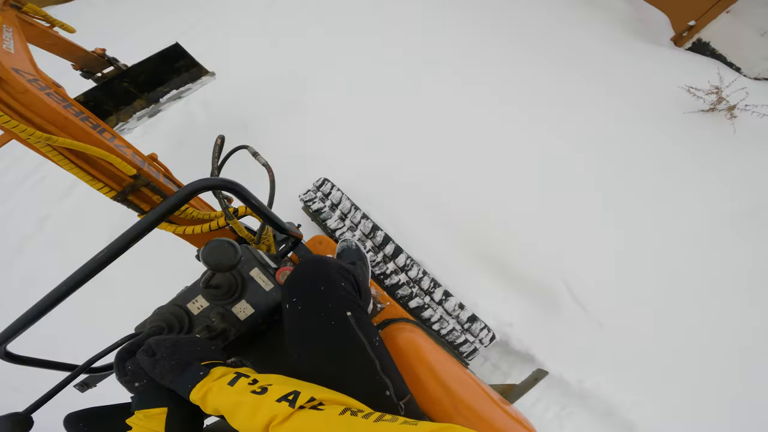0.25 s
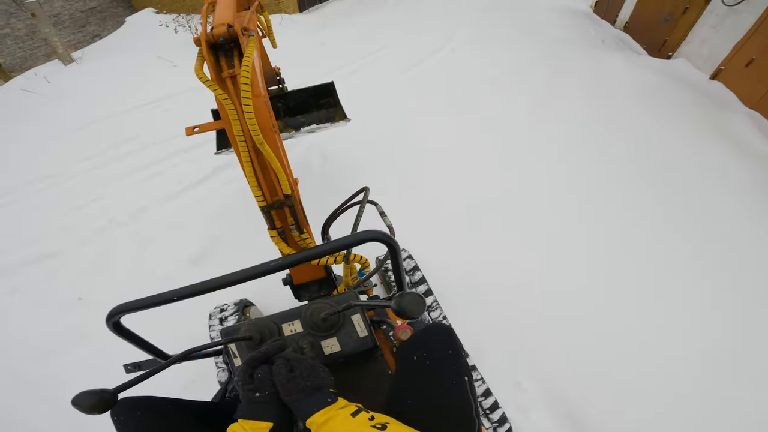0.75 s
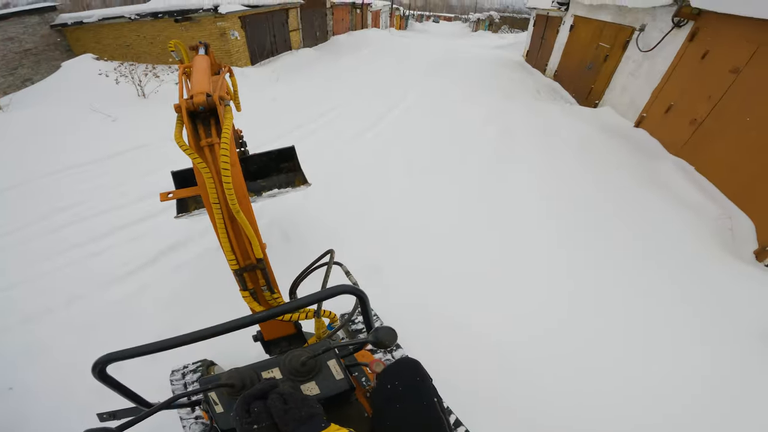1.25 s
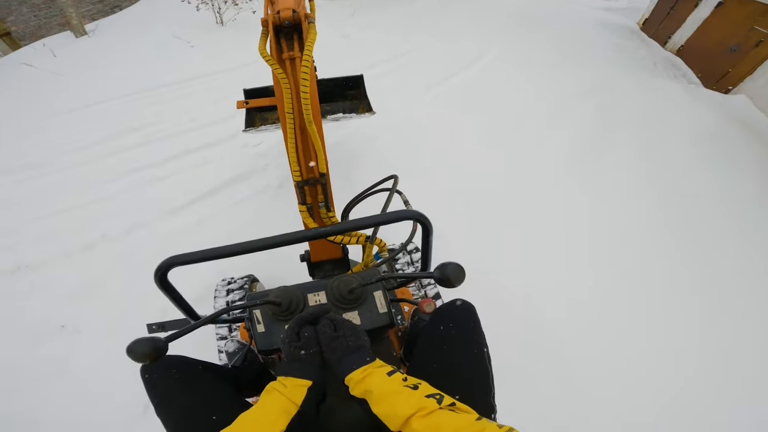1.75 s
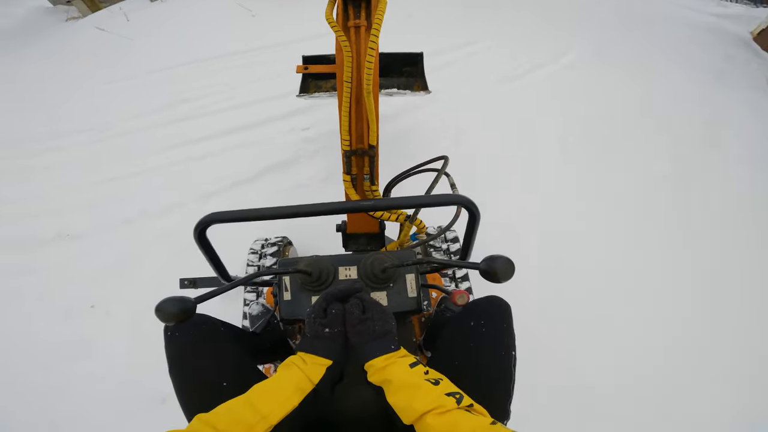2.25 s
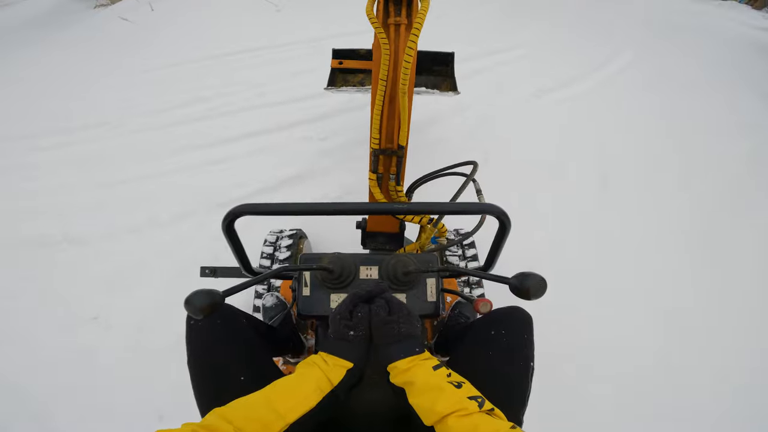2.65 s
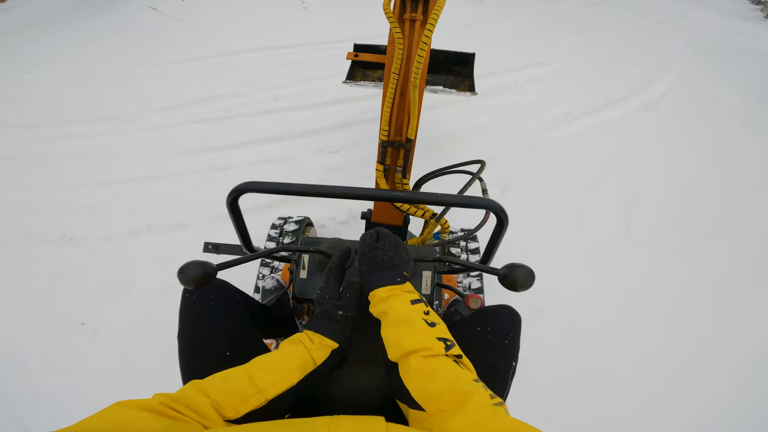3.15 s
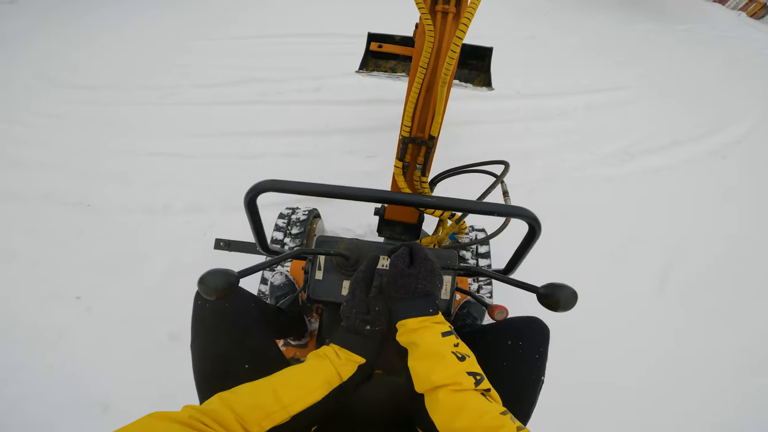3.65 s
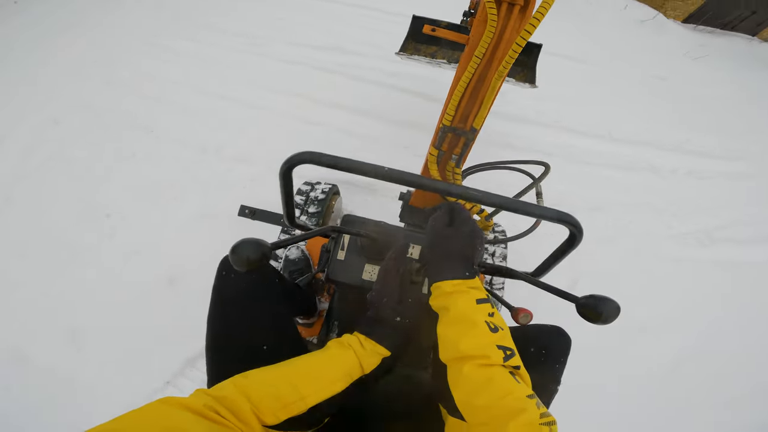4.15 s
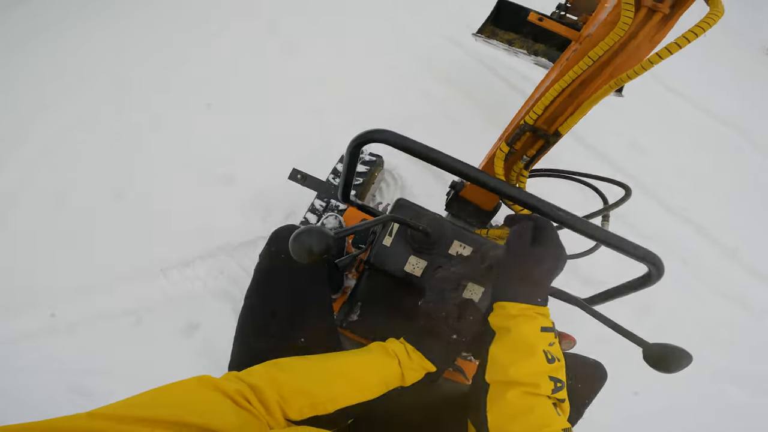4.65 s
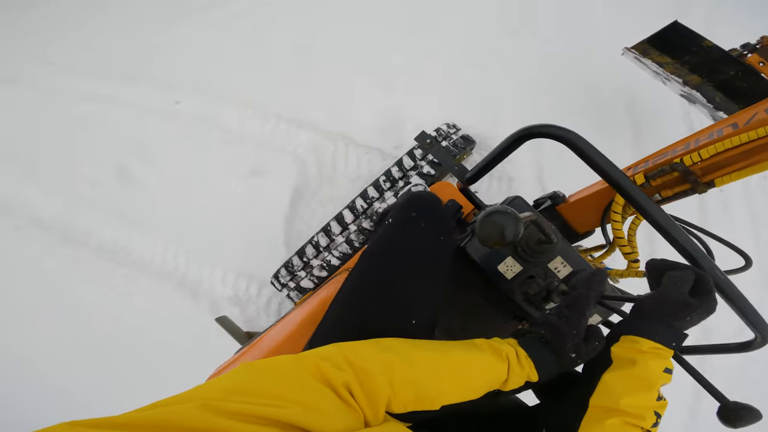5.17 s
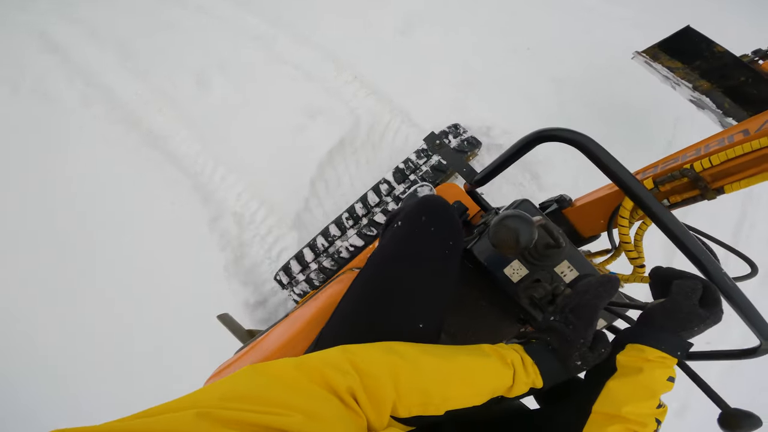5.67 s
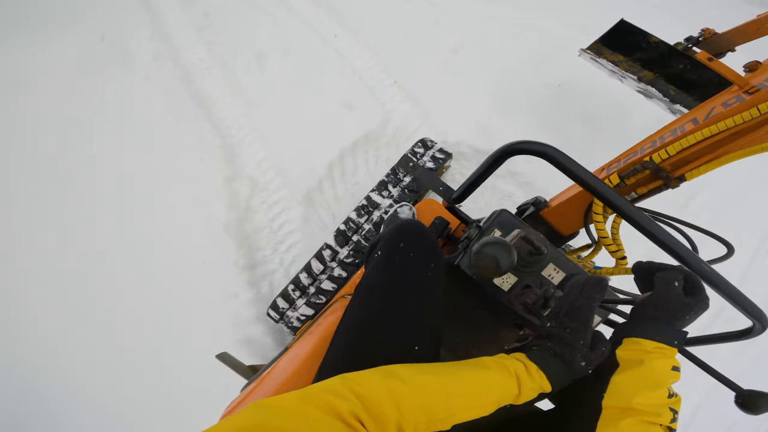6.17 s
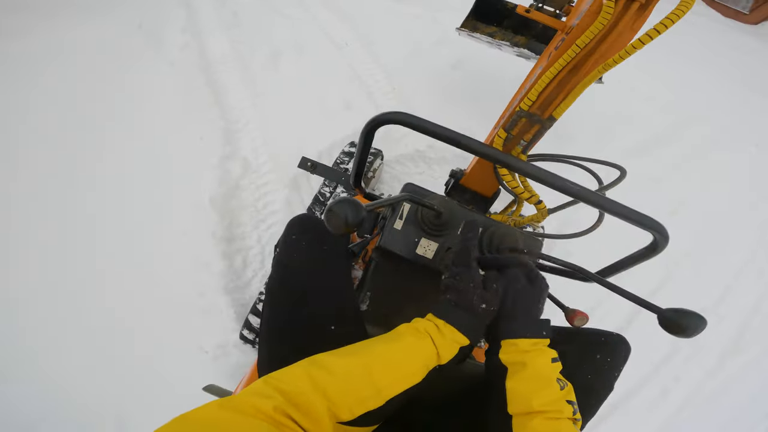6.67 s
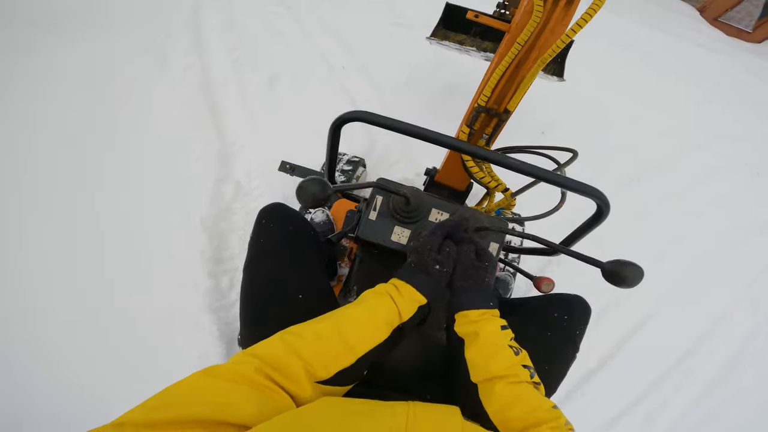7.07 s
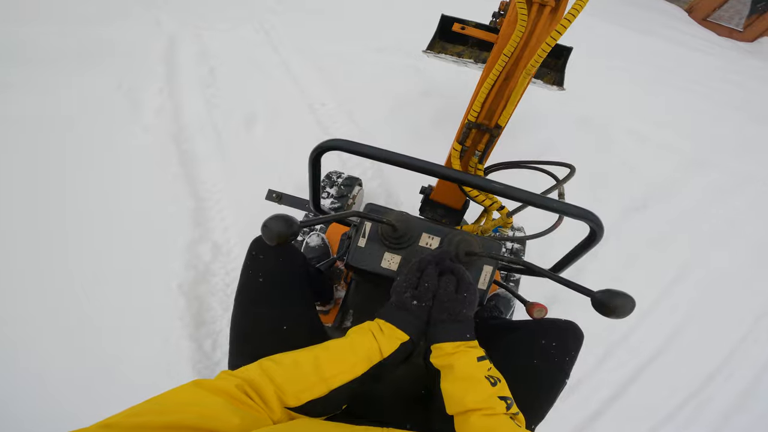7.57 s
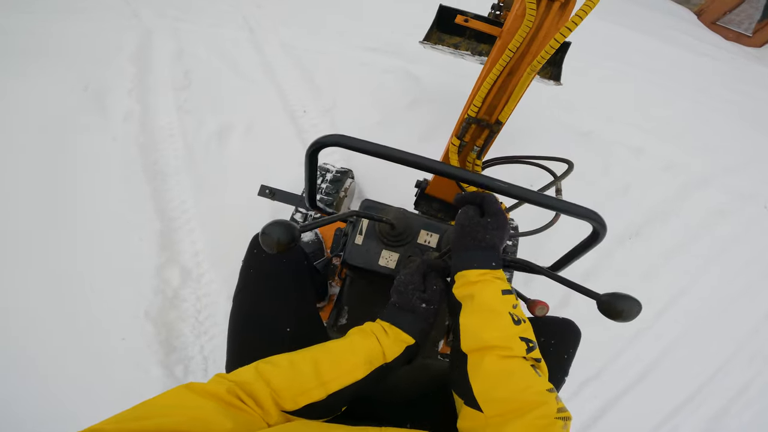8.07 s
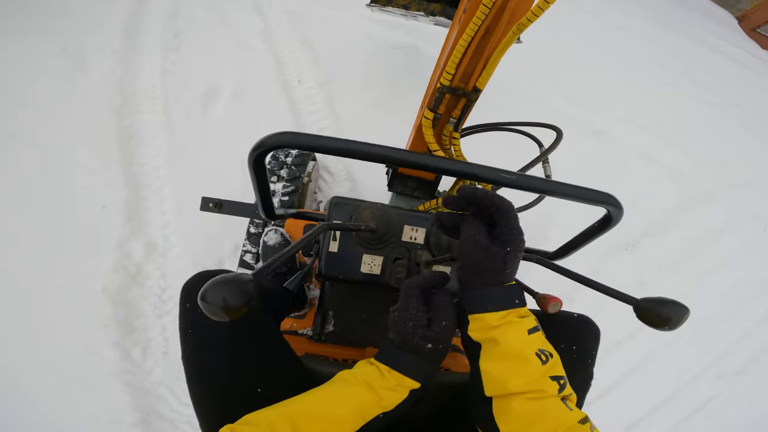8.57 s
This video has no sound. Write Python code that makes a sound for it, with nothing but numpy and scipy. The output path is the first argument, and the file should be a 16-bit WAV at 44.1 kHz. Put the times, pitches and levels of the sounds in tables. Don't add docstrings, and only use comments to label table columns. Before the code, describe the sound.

A small one-cylinder diesel chugs steadily under a crawling tracked digger, with loose metal track links clinking and ice crunching faintly in snow.

```python
import sys
import numpy as np
from scipy import signal
from scipy.fft import rfft, irfft, next_fast_len
from scipy.io import wavfile
from scipy.ndimage import uniform_filter1d

SR = 44100
rng = np.random.default_rng(int(sys.argv[2]) if len(sys.argv) > 2 else 0)


def output_pcm(signal):
    pcm = np.clip(np.atleast_2d(signal).T, -1, 1) * 32767
    wavfile.write(sys.argv[1], SR, np.round(pcm).astype(np.int16))


def field_ratio(decibels):
    return 10 ** (np.asarray(decibels, dtype=float) / 20)


N = 388962
T = np.arange(N) / SR


def level(x, db):
    return x * field_ratio(db) / np.sqrt(np.mean(x ** 2))


def band(x, hz, width):
    width_rad = 2 * np.pi * width
    b, a = signal.bilinear([width_rad, 0], [1, width_rad, (2 * np.pi * hz) ** 2], SR)
    return signal.lfilter(b, a, x)


def dull(x, hz):
    return signal.sosfilt(signal.butter(3, hz, fs=SR, output="sos"), x)


def thin(x, hz):
    return signal.sosfilt(signal.butter(3, hz, "high", fs=SR, output="sos"), x)


def colour(x, spectrum):
    hz, db = np.transpose(spectrum)
    size = next_fast_len(N)
    f = np.arange(size // 2 + 1) * SR / size + 1
    gain = field_ratio(np.interp(np.log(f), np.log(hz), db))
    return irfft(rfft(x, size) * gain, size)[:N]


def walk(rate):
    hold = int(SR / rate)
    steps = np.repeat(rng.standard_normal(N // hold + 1), hold)[:N]
    return 0.75 * uniform_filter1d(uniform_filter1d(steps, hold), hold)


def clicks(times, sizes):
    place = np.clip(np.asarray(times) * SR, 0, N - 2)
    i = place.astype(int)
    return np.bincount(i, sizes * (1 - place + i), N) + np.bincount(i + 1, sizes * (place - i), N)


def die_away(hits, t60):
    return signal.lfilter([1], [1, -np.exp(-np.log(1000) / (t60 * SR))], hits)


def burst(times, db, t60):
    return die_away(clicks(times, field_ratio(db)), t60) * rng.standard_normal(N)


def struck(times, db, hz, t60):
    width = np.log(1000) / (np.pi * t60)
    return band(clicks(times, field_ratio(db)), hz, width) * SR / (2 * np.pi * width)


def strokes(turns, at, scatter_db, jitter_s):
    cycles = np.arange(int(turns[-1]) + 1) + at
    cycles = cycles[(cycles > turns[0]) & (cycles < turns[-1])]
    late, size = rng.standard_normal((len(cycles), 2)).T
    times = np.interp(cycles, turns, T) + jitter_s * late
    return clicks(times, field_ratio(scatter_db * size)) * SR / 43


def ring(pulses, modes):
    return sum(np.sign(way) * field_ratio(db) * band(pulses, hz, width) for hz, width, db, way in modes)


def gate(start_s, length_s, fade_s):
    return np.clip(np.minimum(T - start_s, start_s + length_s - T) / fade_s, 0, 1)


# pitch_hz, share_0_to_1
LIKENESS = [(100, 0.5), (500, 0.92), (1000, 0.82), (2500, 0.67), (6000, 0.82), (12000, 0.93)]


def wide(mid, side):
    hz, share = np.clip(np.array(LIKENESS), 0, [SR, .999]).T
    odd = colour(side, np.c_[hz, 10 * np.log10((1 - share) / (1 + share))])
    return np.array([mid + odd, mid - odd])


# time_s, speed_hz
SPEED = [(0.0, 21.567), (1.66, 21.609), (2.04, 21.588), (2.31, 21.768), (3.12, 21.614), (3.39, 22.116),
         (4.11, 22.017), (4.17, 22.118), (4.52, 20.937), (4.99, 21.323), (5.55, 21.176), (6.64, 21.277),
         (6.86, 21.797), (6.96, 21.17), (8.09, 21.496), (8.19, 21.919), (8.49, 20.913), (8.82, 20.985)]


def engine():
    speed_hz = np.interp(T, *np.transpose(SPEED))
    return speed_hz, .1357 + np.cumsum(speed_hz) / SR


# pitch_hz, width_hz, level_db, polarity (-1 or 1)
EXHAUST = [(28.1, 19, -21, -1), (54.4, 84.5, -21.7, 1), (58.6, 14, -15.6, -1), (142.3, 10, -15.6, 1),
           (205.5, 11.7, -17.5, -1), (274.8, 35.2, -31.7, -1)]
INTAKE = [(4, 10, -19.1, -1), (124.8, 37.9, -24.4, -1), (196, 40.2, -21.4, 1), (311, 10, -29.3, 1),
          (374, 10, -28.4, 1)]
HOOD = [(228, 21.4, -28, 1), (273.2, 12, -27, -1), (329, 32, -29.5, 1), (365.7, 12, -26.5, -1),
        (428, 28, -43, 1), (506, 54, -45, -1)]


def gas(turns, hood_db, throb_db):
    exhaust = ring(strokes(turns, .7734, .2, .00005), EXHAUST)
    intake = ring(strokes(turns, .0799, .3, .00005), INTAKE)
    puff = signal.windows.gaussian(201, .0005 * SR)
    slaps = strokes(turns, .36, .8, .00006) - .45 * strokes(turns, .86, .8, .00006)
    hood = level(ring(slaps, HOOD), -3.0) * field_ratio(hood_db)
    out = np.convolve(exhaust + intake, puff / puff.sum(), "same") + hood
    lead = int(np.interp(turns[0] + 4, turns, T) * SR)
    out = np.r_[out[lead:2 * lead], out[lead:]]
    out = out + (field_ratio(throb_db) - 1) * band(out, 148.0, 42)
    return np.array([out * field_ratio(-.3), np.roll(out, 1)])


# pitch_hz, width_hz, level_db, polarity (-1 or 1)
BLOCK = [(956, 57, 9.5, 1), (1009, 41, 13, -1), (1090, 220, -14.5, 1), (1783, 31, -1, -1), (690, 70, -3, 1)]
HEAD = [(1128, 44, 13, 1), (1191, 50, 4.5, 1), (1261, 25, 5, 1), (2970, 190, -19, 1),
        (4300, 400, -31.5, -1)]


def knock(turns, block_db, head_db, cover_db):
    firing = strokes(turns, .49, 1.6, .00003)
    valves = strokes(turns, .82, 0.67, .0001) + field_ratio(-5.0) * strokes(turns, 0.3, 0.83, .0001)
    raps = firing + field_ratio(-5.5) * valves
    block = level(ring(raps, BLOCK), -7.5) * field_ratio(block_db)
    head = level(ring(raps, HEAD), -9.0) * field_ratio(head_db)
    cover = level(band(raps, 1074, 82), -9.5) * field_ratio(cover_db)
    return block + head + cover


def pump(turns, low_db, high_db, hood_db):
    def tone(order, db):
        loudness = np.sqrt(2) * field_ratio(db + 1.8 * walk(12))
        return loudness * np.sin(2 * np.pi * order * turns + 0.25 * walk(5))

    low = tone(28, low_db - 1.5) + tone(20, np.maximum(hood_db - 15, low_db - 2.5))
    return low + tone(24, high_db) + tone(32, high_db) + tone(56, high_db - 7.5)


def valve_gear(turns, db):
    def rasp(hits, t60):
        return die_away(hits, t60) * rng.standard_normal((2, N))

    intake_seat = strokes(turns, .04, 3.0, 0.00048)
    exhaust_seat = strokes(turns, .3, 2.5, 0.00093)
    seats = rasp(intake_seat + exhaust_seat, .045)
    seats = level(band(band(seats, 2900, 2400), 2900, 2400), -8.0)
    spit = rasp(strokes(turns, .51, 2.3, 0.0009), 0.036)
    spit = level(dull(band(band(spit, 7000, 3000), 7000, 3000), 9000), -21)
    return wide(*(seats + spit)) * field_ratio(db)


# time_s, peak_db, treble_db, own_pitch_hz
LEFT_CLINKS = [(0.351, -26.5, -31, 2280), (0.759, -27, -29, 2450), (0.8076, -15, -36, 2310),
               (0.949, -16, -23, 2310), (1.0358, -23, -22, 2290), (1.089, -15.5, -24, 2326),
               (1.165, -31, -26, 2450), (1.4277, -31, -29, 2130), (1.4672, -19, -23, 3170),
               (1.6258, -28.5, -12, 3600), (1.7766, -24, -17, 2300), (1.918, -20, -14, 3140),
               (2.0416, -31, -13, 2270), (2.0564, -14.5, -15, 2280), (2.1785, -22.5, -13.5, 3480),
               (2.193, -17, -17, 2330), (2.25, -19, -27, 2430), (2.2644, -22.5, -17, 2450),
               (2.338, -30.5, -23, 3370), (2.6788, -36, -16, 2100), (2.8126, -31, -23, 2360),
               (2.957, -37, -31, 2780), (3.3821, -22.5, -27, 2730), (3.406, -23, -28, 2440),
               (3.439, -23.5, -19, 1960), (3.527, -22, -26, 2440), (3.5469, -24, -30, 2430),
               (3.5686, -25, -35, 2460), (3.706, -28, -25, 2450)]
RIGHT_CLINKS = [(4.384, -26.5, -35, 2450), (4.76, -26, -23, 4020), (5.0217, -32, -12, 2300),
                (5.124, -33, -22, 2700), (5.19, -24, -30.5, 3110), (5.36, -35, -11, 2300),
                (5.471, -34, -6, 2360), (6.0757, -19.5, -15, 2920), (6.161, -28.5, -17, 3060),
                (6.399, -32.5, -17, 2980), (6.516, -25.5, -30, 3000), (6.536, -27.5, -22, 2250),
                (6.8093, -29, -29, 2440), (6.8963, -29, -17, 2380), (7.037, -23.5, -14, 2770),
                (7.08, -23.5, -24, 2400), (7.1843, -20, -18, 2260), (7.3178, -22, -21, 2610),
                (7.491, -19, -36, 2400), (7.5536, -22.5, -14, 2100), (7.6066, -26, -29, 2330),
                (7.6385, -22, -27, 2500), (7.763, -28, -24, 2140), (8.105, -21.5, -31, 2460),
                (8.128, -25, -26, 2440), (8.258, -25, -31, 2400), (8.3967, -19.5, -34, 2100),
                (8.4157, -26, -13, 2100), (8.568, -24.5, -19, 2500), (8.7293, -23, -16, 2310)]


def track_hits(count):
    faint = []
    for when, size, pitch, pan in rng.random((count, 4)):
        hz = 2500 * (0.66 + .5 * pitch)
        faint.append((.99 * when * N / SR, -40 + 6 * (size - .5), -15.5, hz, 8 * (pan - .5)))
    left = [(*hit, 3) for hit in LEFT_CLINKS]
    right = [(*hit, -3.5) for hit in RIGHT_CLINKS]
    return sorted(left + right + faint)


# pitch_hz, level_db, fall_by_60_db_s
CLINK_MODES = [(1890, -3, 0.019), (2100, -20.5, 0.16), (2367, -3, 0.059), (3258, -0.5, 0.03),
               (3370, -11, 0.021), (3540, -13, 0.18), (4320, -19, 0.021), (4300, -26.5, 0.094),
               (5920, -8.5, 0.058)]


def clinks():
    s, db, treble_db, own_hz, pan_db = np.transpose(track_hits(count=18))
    share_db = 1.3 * rng.standard_normal((len(s), len(CLINK_MODES)))
    rings = 0
    for k, (hz, mode_db, t60) in enumerate(CLINK_MODES):
        rings = rings + struck(s, db + mode_db + share_db[:, k] - 9.0, hz, min(t60, .065) * 0.9)
    for at, size_db, hz in zip(s, db, own_hz):
        i = int(at * SR)
        ringing = T[:min(4000, N - i)]
        fall = field_ratio(size_db - 11.0 - 60 * ringing / 0.067)
        rings[i:i + 4000] += fall * np.sin(2 * np.pi * hz * ringing)
    crack = band(band(burst(s, db + 1.0, 0.047), 3600, 3500), 3600, 3500)
    treble = band(band(burst(s, db + treble_db + 6.5, 0.05), 6900, 5000), 6900, 5000)
    side = band(burst(s, db - 7.5, .08), 3000, 4000)
    both = wide(dull(rings + crack, 7400) + dull(treble, 13000), side)
    pan_db = pan_db[np.clip(np.searchsorted(s - .002, T) - 1, 0, None)]
    return both * field_ratio(np.array([pan_db, -pan_db]) / 2)


# time_s, peak_db, upper_pitch_hz, upper_level_db
KNOCKS = [(0.943, -16, 1820, -27), (1.616, -20, 1340, -36), (1.899, -26, 1810, -29.5),
          (2.038, -19, 1650, -27.5), (2.18, -19, 1824, -26), (2.886, -18, 1350, -36),
          (3.44, -16.5, 1890, -29.5), (6.072, -42, 1390, -26.5), (7.16, -11.5, 1514, -23.5),
          (7.552, -19, 1547, -23.5), (7.73, -22, 1390, -27.5), (7.88, -22, 1545, -26)]


def knocks():
    blows = 0
    for s, db, hz, upper_db in KNOCKS:
        plate = struck([s], db - 4.5, 812, 0.057)
        upper = struck([s], upper_db, hz, 0.08)
        thud = band(burst([s], upper_db + 10.5, 0.15), 1100, 2000)
        blows = blows + plate + upper + thud
    return dull(blows, 2200)


# time_s, peak_db, pitch_hz
TICKS = [(2.8863, -34.5, 6660), (3.0285, -32, 6740), (3.178, -29, 7150), (3.2869, -38, 6660),
         (3.3089, -38, 7160), (4.7247, -38, 7630), (7.273, -34, 6400)]


def ice_ticks():
    ticks = 0
    for s, db, hz in TICKS:
        ticks = ticks + band(band(burst([s], db + 7.5, 0.024), hz, 2500), hz, 2500)
    return dull(ticks, 15000)


# start_s, length_s, level_db, pitch_hz
CRUNCHES = [
    (3.223, 0.07, -52.5, 9800),
    (6.865, 0.04, -56, 10000),
]


def crunches():
    out = 0
    for s, length, db, hz in CRUNCHES:
        hiss = level(band(band(rng.standard_normal(N), hz, 3200), hz, 3200), db)
        out = out + hiss * gate(s, length, .006) * field_ratio(3 * walk(120))
    return out


def grit(turns, rate, spread_db, share, swing_db, turn):
    when, size, sign = rng.random((int(rate * N / SR), 3)).T
    size_db = np.minimum(-spread_db * np.log(size), 3 * spread_db)
    hail = clicks(when * N / SR, field_ratio(size_db) * np.sign(sign - .5))
    tail = np.exp(-np.arange(100) / (.0004 * SR)) * rng.standard_normal(100)
    noise = rng.standard_normal(N) + share * level(signal.fftconvolve(hail, tail)[:N], 0)
    return noise * field_ratio(swing_db * np.cos(2 * np.pi * (turns - turn)) + 0.74 * walk(14))


# pitch_hz, level_db_per_hz
RUMBLE = [(20, -30), (60, -19), (170, -16), (300, -20.5), (420, -22.5), (570, -24), (800, -27.5),
          (1250, -29)]
RUSTLE = [(1480, -36), (1760, -33.5), (2050, -39.5), (2900, -38.5), (4500, -43), (6000, -47.5),
          (7000, -53.5), (12500, -86)]
HISS = [(2940, -3), (5000, 2), (8250, -7), (9340, -4.5), (10800, -15), (12300, -22), (14400, -37.5),
        (15000, -48.5)]


def rustle(turns, rustle_db, hiss_db):
    def rough():
        below = dull(grit(turns, 400, 2.4, .45, 2.6, .57), 1500)
        above = thin(grit(turns, 400, 2.4, .45, .5, .5), 1500)
        return colour(below + above, RUMBLE + RUSTLE)

    def fine():
        return colour(grit(turns, 500, 2.5, .5, .5, .55), HISS)

    low = wide(rough(), rough())
    high = wide(fine(), fine())
    treble = np.sqrt(np.mean(band(low[0], 3390, 4090) ** 2))
    low = low / treble * field_ratio(uniform_filter1d(rustle_db, SR) + 0.36)
    return low + level(high, 1.9) * field_ratio(hiss_db)


# pitch_hz, level_db_per_hz
JET = [(9800, -30), (11200, -5), (12300, 0), (13200, -6), (14600, -24)]


def jet(turns, db):
    mid, side = (colour(grit(turns, 300, 3.0, .5, 1.5, .55), [(20, -90)] + JET) for _ in "ms")
    both = mid + .35 * side * np.array([[1], [-1]])
    return level(both, 0) * field_ratio(db + 1.5 * walk(8))


# start_s, length_s, pitch_hz, level_db
WHISTLES = [
    (0.05, 0.74, 2700, -61),
    (0.95, 0.4, 3670, -59),
    (3.55, 0.85, 4320, -56),
    (7.6, 0.5, 7800, -64),
]


def whistles():
    out = 0
    for s, length, hz, db in WHISTLES:
        tone = np.sin(2 * np.pi * hz * T + 1.7 * walk(40))
        out = out + gate(s, length, .1) * field_ratio(db + 2.5 * walk(25)) * tone
    return out


# time_s, turn (right -1 to left 1), left_minus_right_db
LOOK = [(0.0, -0.97, 11), (0.6, -0.79, 9), (1.1, -0.36, 8.5), (2.1, 0.03, 7), (3.2, 0.3, 4.5),
        (4.2, -0.34, 4.5), (4.55, 0.34, 3.5), (5.1, 0.79, 4.5), (6.0, 0.83, 3.5), (6.7, 0.72, 4),
        (7.3, 0.15, 5.5), (8.0, 0.31, 2.5), (8.82, 0.45, 7)]
# ahead_db, gain_looking_right_db, gain_looking_left_db, gain_at_full_load_db
PARTS = [
    (-51, 16.5, 7, 8),
    (-49.5, -0.3, 6, 5),
    (-38, 3, 11, 0),
    (-37, -6, -3, -5.5),
    (-29, -1, 1.5, -2.6),
    (-43, 0.3, 3, 0.07),
    (-57.5, -2.5, 4, 2.5),
    (-76, -3, 5, 4.5),
]


def heard(speed_hz):
    time_s, turn, pan_db = np.transpose(LOOK)
    turn, pan_db = np.interp(T, time_s, turn), np.interp(T, time_s, pan_db)
    free_hz, droop_hz = 21.7, .7
    load = uniform_filter1d((free_hz - speed_hz) / droop_hz, SR // 4)
    right, left = np.clip(-turn, 0, None), np.clip(turn, 0, None)
    parts = []
    for db, right_db, left_db, load_db in PARTS:
        wander_db = 1.27 * walk(3.004)
        parts.append(db + right_db * right + left_db * left + load_db * load + wander_db)
    throb_db = 2.5 - 3.5 * np.clip(load, 0, None)
    return parts, pan_db, throb_db


def scene():
    speed_hz, turns = engine()
    parts, pan_db, throb_db = heard(speed_hz)
    low_db, high_db, block_db, head_db, hood_db, rustle_db, hiss_db, jet_db = parts
    upper = knock(turns, block_db, head_db, low_db)
    upper = upper + pump(turns, low_db, high_db, hood_db)
    upper = upper + valve_gear(turns, rustle_db)
    upper = upper + knocks() + ice_ticks() + crunches()
    upper = upper + rustle(turns, rustle_db, hiss_db)
    upper = upper + jet(turns, jet_db) + whistles()
    upper = upper * field_ratio(0.21 * np.array([pan_db, -pan_db]) / 2)
    return gas(turns, hood_db, throb_db) + upper + clinks()


def band_limit(x):
    return signal.sosfilt(signal.butter(12, 15150, fs=SR, output="sos"), x)


def record(dry):
    mix = dull(dry, 13000)
    return band_limit(mix)


dry = scene()
out = record(dry)
output_pcm(out)
```